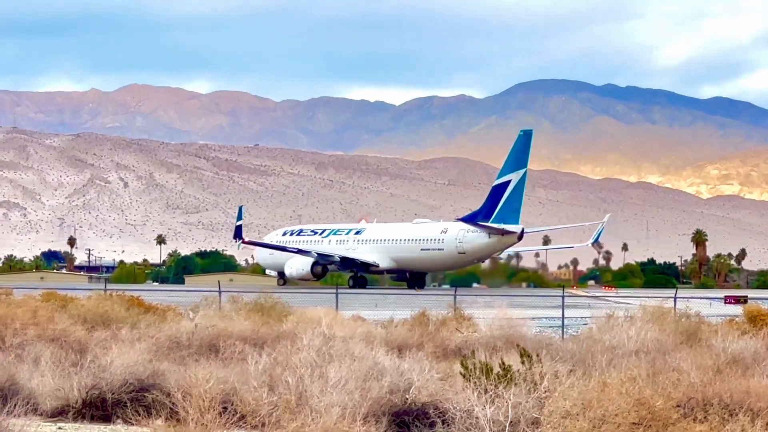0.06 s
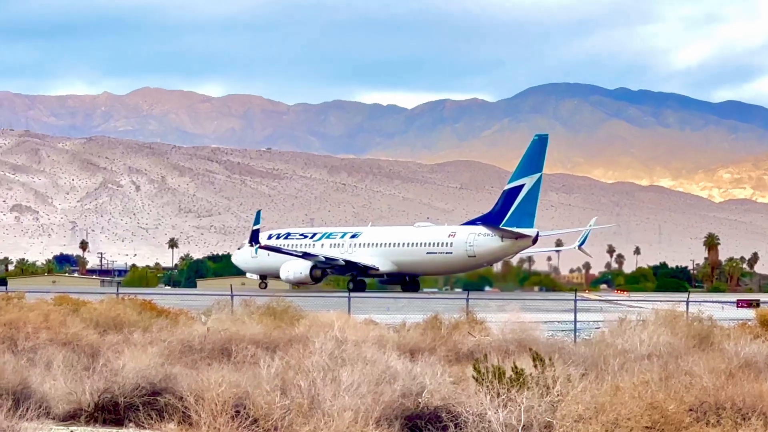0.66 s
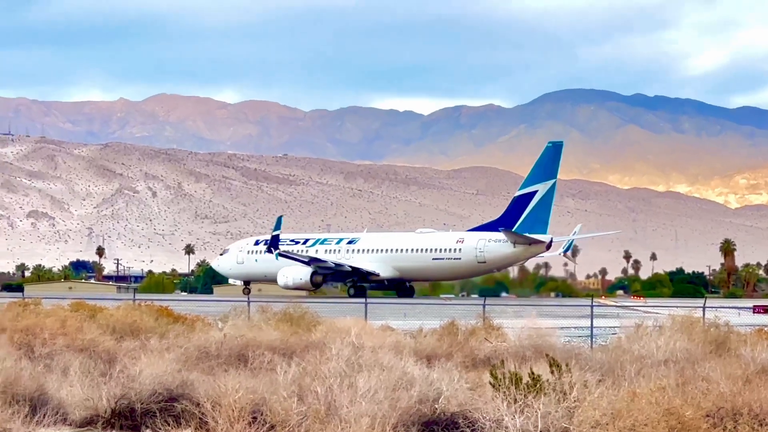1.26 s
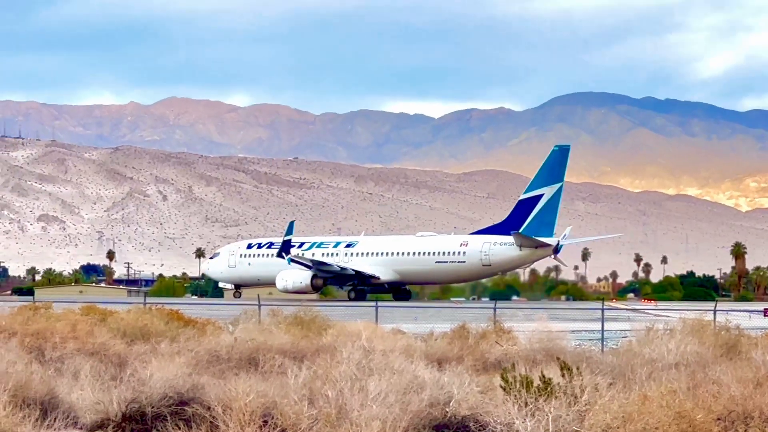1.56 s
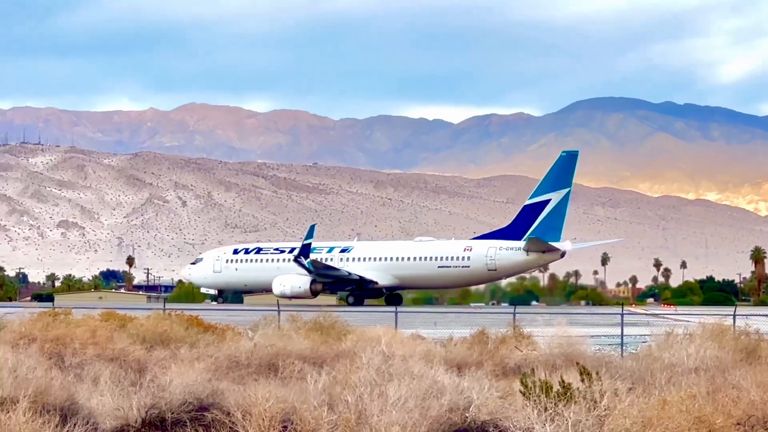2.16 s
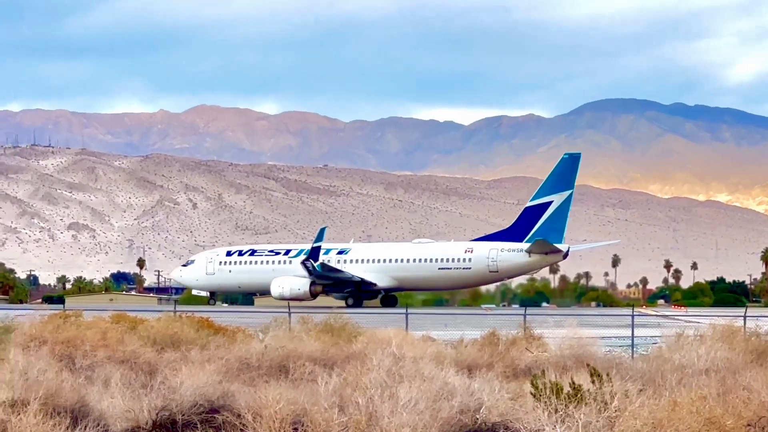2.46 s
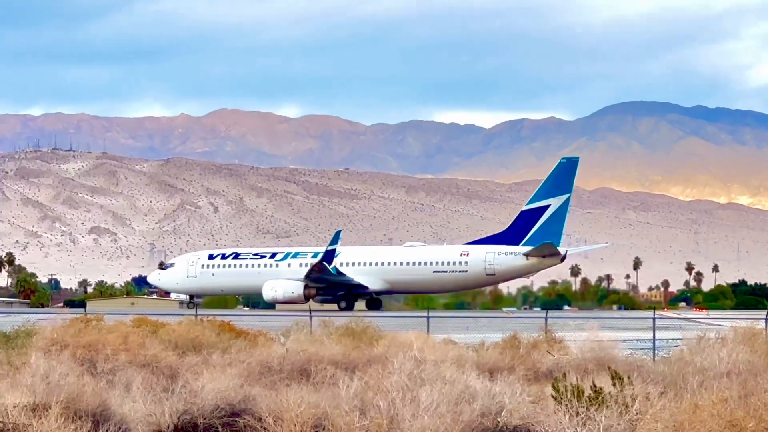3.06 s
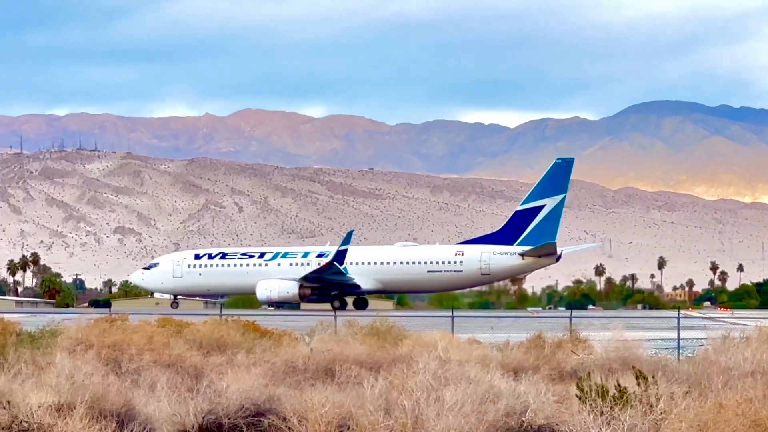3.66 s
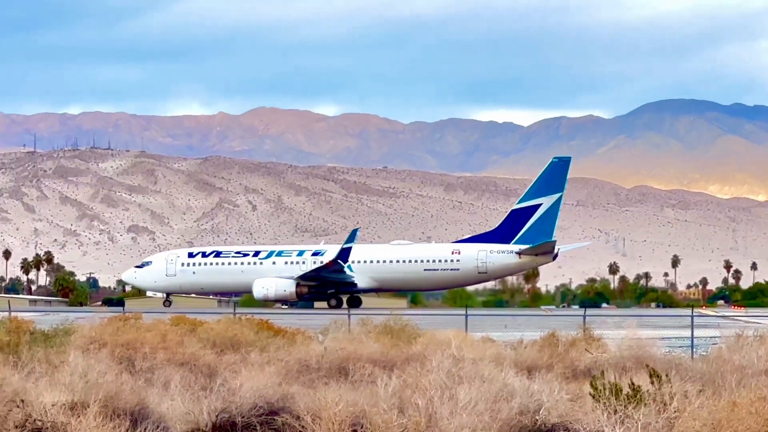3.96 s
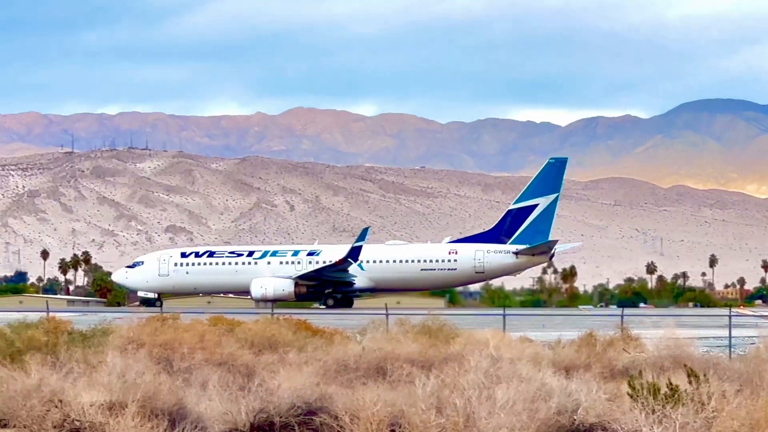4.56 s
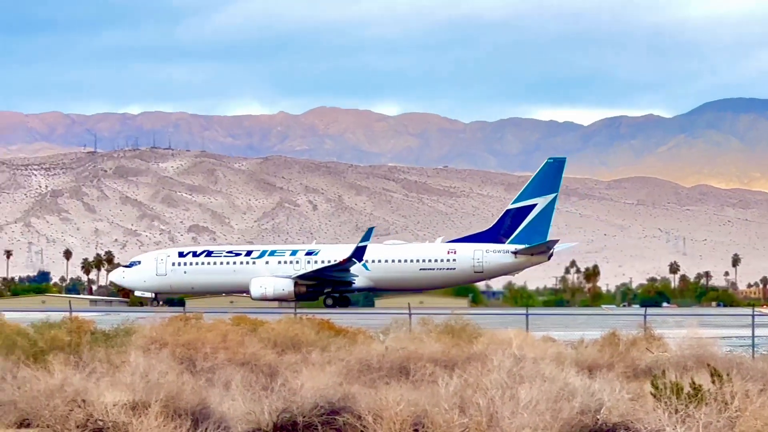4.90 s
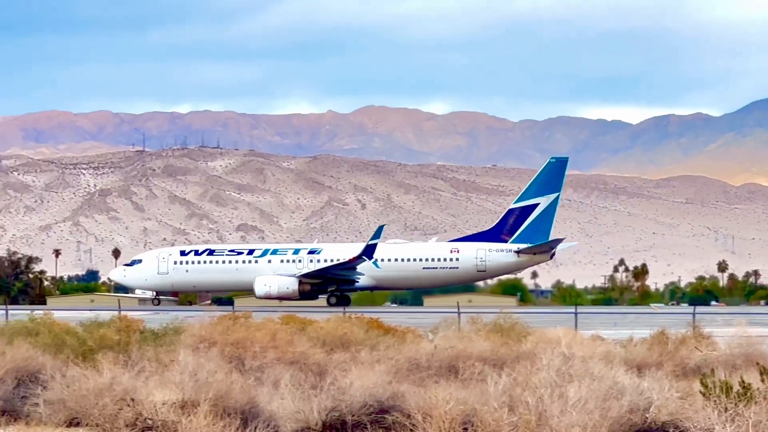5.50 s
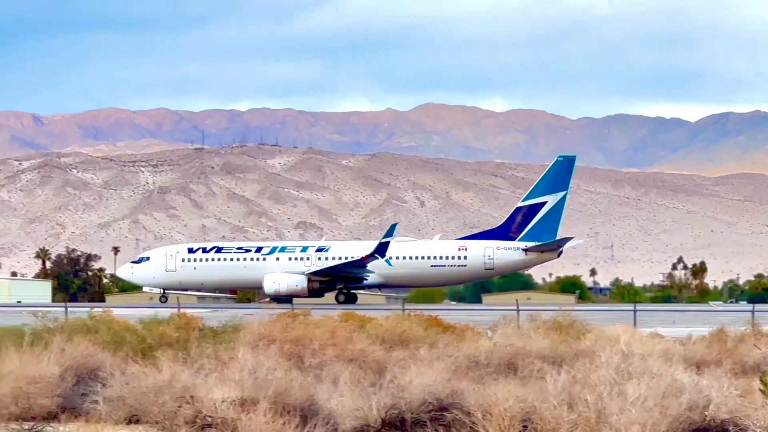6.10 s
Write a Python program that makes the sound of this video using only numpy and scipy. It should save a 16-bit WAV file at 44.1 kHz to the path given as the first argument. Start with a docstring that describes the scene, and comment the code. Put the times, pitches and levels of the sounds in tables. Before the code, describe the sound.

Jet engines build to takeoff power some way off, rumbling and roaring, while a wide, nearer rush grows near the end.

```python
"""A distant rumble swells into a roar: a twin-engined airliner spools up and starts its takeoff roll.
Turbulent eddies in the exhaust radiate the noise, and reflection off the scrubland cancels a band in
its middle. The whine of the passing fan blades sinks into it, and moving air makes it all swell and fade.
Late on, a wide, nearer rush grows, like tyres approaching on a road."""
import sys
import numpy as np
from scipy import signal
from scipy.io import wavfile
from scipy.ndimage import uniform_filter1d

SR = 44100
rng = np.random.default_rng(int(sys.argv[2]) if len(sys.argv) > 2 else 0)


def wav_out(sig):
    """Save sig, one row per channel (or a flat mono array), as 16-bit PCM at SR to the path in sys.argv[1]."""
    wavfile.write(sys.argv[1], SR, np.round(np.clip(np.atleast_2d(sig).T, -1, 1) * 32767).astype(np.int16))


N = 279594
FRAME, HOP = 2048, 512
HZ = np.fft.rfftfreq(FRAME, 1 / SR)
TIMES = np.arange(N // HOP + 3)[:, None] * HOP / SR
TURN_S = (2.4, 4.3)  # the aircraft swings side-on between these times

# exhaust power as the engines spool up: time_s, relative_db
THRUST = [(0, -14), (.5, -10), (1, -6.5), (1.5, -2), (2.2, 0.5), (3.3, 0), (5.5, 0), (6.34, 2)]
# likeness of left and right: frequency_hz, coherence (0-1)
COHERENCE = [(60, .999), (150, .997), (300, .993), (1000, .98), (1400, .975), (1800, .997), (2500, .997),
             (3200, .95), (4000, .91), (5200, .98)]


def rumble(t):
    """Jet noise directivity: large eddies in the plume beam low sound aft, smaller ones more sideways."""
    # spectra of the largest, middle and smaller eddies: frequency_hz, relative_db
    boom_spectrum = [(20, -14.5), (45, -6.5), (65, 0.5), (80, -0.5), (100, -15), (140, -36), (1000, -140)]
    body_spectrum = [(40, -47.5), (70, -11), (95, 1.5), (125, -0.5), (160, -1.5), (200, -4), (240, -20),
                     (350, -44), (2400, -140)]
    growl_spectrum = [(100, -40.5), (180, -10.5), (225, 0.5), (300, -6), (360, -12.5), (420, -19.5),
                      (490, -19), (700, -35), (1200, -55), (7000, -140)]
    # the rumble heaves or drops away for a moment: time_s, half_length_s, gain_db, centre_hz
    surges = [(.84, 0.071, 6, 94), (1.332, 0.11, 6, 105), (1.56, 0.047, 1.5, 140), (1.816, 0.067, 4, 200),
              (2.17, 0.15, 2.5, 169), (3.03, 0.079, 5.5, 70), (3.49, 0.047, 5.5, 63),
              (4.246, 0.057, 4, 72.5), (5.384, .06, -7, 81.8), (5.777, 0.044, -10, 88),
              (5.902, 0.016, 13.5, 103)]
    boom = eddies(t, boom_spectrum, level_db=-25.5, thrust_share=.89, turn_db=-2, surge_db=.74)
    body = eddies(t, body_spectrum, level_db=-20, thrust_share=1.24, turn_db=-2, surge_db=.5)
    growl = eddies(t, growl_spectrum, level_db=-29.5, thrust_share=.91, turn_db=2.5, surge_db=.56)
    octaves = np.log2(HZ + 1)
    heave_db = sum(db * bell(TIMES, s, length) * bell(octaves, np.log2(hz), width=.35)
                   for s, length, db, hz in surges)
    return shaped(boom + body + growl, heave_db)


def eddies(t, spectrum, level_db, thrust_share, turn_db, surge_db):
    """Turbulent mixing at one eddy size: it follows the thrust, shifts with the turn, surges at random."""
    db = level_db + thrust_share * follow(THRUST, t) + turn_db * ramp(t, *TURN_S)
    noise = turbulence(colour(spectrum, HZ), colour(COHERENCE, HZ), steady_samples=12000)
    return noise * amp(db + surge_db * drift(t, rate_hz=18))


def mixing_roar(t, gain_db=4):
    """Fine eddies roar; destructive interference with the ground reflection leaves a hollow near 720 Hz."""
    # spectrum of the roar, hollow included: frequency_hz, relative_db
    spectrum = [(250, -44), (480, -14.5), (600, -14), (670, -12.5), (720, -23.5), (780, -11.5), (840, -7),
                (950, -2), (1120, -3), (1300, -6), (1600, -8), (1900, -12.5), (2150, -21.5), (2800, -35.5),
                (13000, -130)]
    # growth of the roar: time_s, relative_db
    levels = [(0, -57.5), (.56, -53), (.7, -51), (1.42, -50), (1.55, -45.5), (2.28, -44), (2.6, -41),
              (3.2, -40.5), (4.75, -41), (5.3, -40.5), (6.34, -40.5)]
    # refraction by wind focuses or thins a band:
    # time_s, half_length_s, gain_db, centre_hz, width_hz, glide_hz_per_s
    focusings = [(.2, 0.088, 4, 1000, 109, -1), (0.348, .22, 8.5, 540, 70, 2),
                 (1.198, 0.24, -9, 540, 100.7, 1.5), (1.78, 0.25, 6, 900, 126, -58),
                 (2.376, .05, 7.5, 1040, 111, 1.5), (2.6, .13, 4, 1560, 111, -2),
                 (2.86, 0.16, 4.5, 1125, 100, -1), (3.75, 0.14, 2, 1030, 129.6, 1),
                 (4.47, 0.13, 5.5, 922, 69.5, -1), (4.8, 0.16, -2, 1430, 199, 1),
                 (5.15, 0.19, 9.5, 1048, 76, -140), (6.05, 0.098, 4.5, 986, 69.6, 0)]
    focus_db = sum(db * bell(TIMES, s, length) * bell(HZ, hz + glide * (TIMES - s), width)
                   for s, length, db, hz, width, glide in focusings)
    shape_db = colour(spectrum, HZ) + 1.3 * patches(seconds=.045, width_hz=66)
    noise = turbulence(shape_db, colour(COHERENCE, HZ))
    return shaped(noise, focus_db) * amp(gain_db + follow(levels, t))


def nozzle_hiss(t, gain_db=1, dull_db_per_khz=1.8, turbine_hz=3560):
    """The smallest eddies, at the nozzle lip, radiate the highest frequencies of the exhaust."""
    # spectrum of the hiss: frequency_hz, relative_db
    spectrum = [(1000, -30), (1900, -6), (2300, -.5), (2700, 0), (3200, -2), (3370, -6), (3520, -3.5),
                (4200, -11), (4700, -15.5), (5300, -21.5), (6300, -29.5), (7500, -46), (9000, -60),
                (14000, -72)]
    # growth of the hiss: time_s, relative_db
    levels = [(0, -68), (1, -64), (2, -56), (2.6, -51.5), (3.5, -51.5), (4.5, -55), (5.3, -54),
              (5.7, -55.5), (6.34, -51.5)]
    # until the thrust builds, the hiss is dull and a narrow turbine band stands out
    idling = 1 - ramp(TIMES, .7, 2.5)
    idle_db = 2.5 * bell(HZ, turbine_hz, width=280) - dull_db_per_khz * HZ / 1000
    shape_db = colour(spectrum, HZ) + idling * idle_db + patches(seconds=.054, width_hz=580)
    return turbulence(shape_db, colour(COHERENCE, HZ)) * amp(gain_db + follow(levels, t))


def fan_whine(t, pitch_hz=1157, sag_hz=7.99, waver_hz=3, scatter=.64, octave_db=-23):
    """The blade-passing tone and its octave flicker as scattered copies interfere with them."""
    # gusts carry the tone over, or away: time_s, half_length_s, gain_db
    gusts = [(.58, .03, -11), (1.04, 0.06, 8), (1.8, 0.074, 5.5), (2.43, 0.03, 8), (3.0, 0.19, 10.5),
             (3.45, 0.063, 6.5), (3.65, 0.043, 6), (4.95, .15, 5)]
    # the tone grows with thrust and fades as the intakes turn away
    db = -51.5 + .79 * follow(THRUST, t) - 3.5 * ramp(t, *TURN_S)
    db += sum(gain_db * bell(t, s, length) for s, length, gain_db in gusts)
    spooling = 1 - ramp(t, 0, .9)  # slightly flat until the fan reaches speed
    hz = pitch_hz - sag_hz * spooling + waver_hz * drift(t, rate_hz=25)
    phasor = np.exp(2j * np.pi * np.cumsum(hz) / SR)
    fundamental = phasor * (1 + scatter * (drift(t, rate_hz=32) + 1j * drift(t, rate_hz=45)))
    octave = phasor ** 2 * (1 + scatter * (drift(t, rate_hz=84) + 1j * drift(t, rate_hz=66)))
    return np.sqrt(2) * amp(db) * (fundamental + amp(octave_db) * octave).real


def nearing_rush(t, nearing_s=4.57, sizzle_start_s=5.2):
    """Low coherence between the ears makes this wash wide; it grows as it nears and gains a sizzle."""
    # spectra of the wash and of its fine sizzle: frequency_hz, relative_db
    wash_spectrum = [(30, -10.5), (150, 3.5), (280, -2), (450, 2), (600, 0), (720, 2.5), (830, 4),
                     (1050, 0.5), (1300, -4), (1700, -16.5), (2200, -24), (2700, -33.5), (3500, -36.5),
                     (5000, -50), (10000, -76.5)]
    sizzle_spectrum = [(1500, -10), (3500, 0), (5500, 3), (6600, 2), (7400, 2.5), (8200, -1.5), (8800, -9),
                       (9800, -16), (10300, -33), (13000, -40)]
    wash_db = -54 + 1.97 * t + 4.5 * np.maximum(t - nearing_s, 0)
    flare_db = 8 * bell(t, centre=5.48, width=.06)
    sizzle_db = -90.5 + 25.5 * np.maximum(t - sizzle_start_s, 0) + flare_db
    wash = turbulence(colour(wash_spectrum, HZ), coherence=.13)
    sizzle_shape_db = colour(sizzle_spectrum, HZ) + patches(seconds=.033, width_hz=400)
    sizzle = turbulence(sizzle_shape_db, colour(COHERENCE, HZ))
    return wash * amp(wash_db) + sizzle * amp(sizzle_db)


def turbulence(shape_db, coherence, steady_samples=8000):
    """Random phases give stereo noise of the given spectral shape, its running rms held near 1."""
    a, b, c, d = rng.standard_normal((4, len(TIMES), len(HZ)))
    left = a + 1j * b
    right = coherence * left + np.sqrt(1 - coherence ** 2) * (c + 1j * d)
    spectra = np.array([left, right]) * amp(shape_db)
    noise = signal.istft(spectra, nperseg=FRAME, noverlap=FRAME - HOP, time_axis=1, freq_axis=2)[1]
    noise = unit(noise[:, :N])
    return noise / np.sqrt(uniform_filter1d((noise ** 2).mean(0), size=steady_samples))


def shaped(x, gain_db):
    """Time-varying filter: a gain for each moment and frequency."""
    spectra = signal.stft(x, nperseg=FRAME, noverlap=FRAME - HOP)[2]
    spectra = spectra * amp(gain_db[:spectra.shape[-1]].T)
    return signal.istft(spectra, nperseg=FRAME, noverlap=FRAME - HOP)[1][:, :N]


def patches(seconds, width_hz):
    """Random swells and fades of rms 1, correlated over about this duration and bandwidth."""
    field = rng.standard_normal((len(TIMES), len(HZ)))
    field = signal.fftconvolve(field, bell(TIMES, TIMES.mean(), seconds), "same")
    return unit(signal.fftconvolve(field, bell(HZ, HZ.mean(), width_hz)[None], "same"))


def drift(t, rate_hz):
    """Superposed sines of random phase wander with rms 1, up to the given rate."""
    rates = np.geomspace(rate_hz / 10, rate_hz, 20)
    return unit(sum(np.sin(2 * np.pi * (f * t + rng.random())) / np.sqrt(f) for f in rates))


def colour(points, hz):
    """A spectrum interpolated on a log-frequency axis."""
    f, value = np.transpose(points)
    return np.interp(np.log(hz + 1e-3), np.log(f), value)


def follow(curve, t):
    """An envelope interpolated at the times t."""
    return np.interp(t, *np.transpose(curve))


def ramp(t, start_s, end_s):
    """A raised-cosine step from 0 to 1."""
    return np.sin(np.pi / 2 * np.clip((t - start_s) / (end_s - start_s), 0, 1)) ** 2


def bell(x, centre, width):
    """A Gaussian bump of height 1."""
    return np.exp(-.5 * ((x - centre) / width) ** 2)


def amp(db):
    """Decibels as an amplitude ratio."""
    return 10 ** (np.asarray(db) / 20)


def unit(x):
    """Scales to rms 1."""
    return x / np.sqrt(np.mean(x ** 2) + 1e-20)


def scene():
    """Superposition of the distant jet, almost central, and the wide rush around it."""
    t = np.arange(N) / SR
    low = rumble(t) * amp([[-.3], [.3]])
    roar = mixing_roar(t) + nozzle_hiss(t)
    flutter = amp(.38 * drift(t, rate_hz=20))
    high = (roar * flutter + fan_whine(t)) * amp([[.05], [-.05]])
    return low + high + nearing_rush(t)


def record(dry):
    """The microphone cuts the lows; the recorder adds faint mirrored sidebands and limits the band."""
    low_cut_hz, mirror_hz, edge_hz = 54, 9600, 13000
    thinned = signal.sosfilt(signal.butter(4, low_cut_hz, "highpass", fs=SR, output="sos"), dry)
    mirrored = thinned * (1 + amp(-62) * np.cos(2 * np.pi * mirror_hz * np.arange(N) / SR))
    band_limit = signal.firwin(511, edge_hz, window=("kaiser", 9), fs=SR)
    return signal.oaconvolve(mirrored, band_limit[None], "same")


dry = scene()
out = record(dry)
wav_out(out)
```